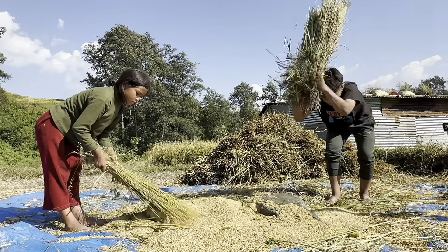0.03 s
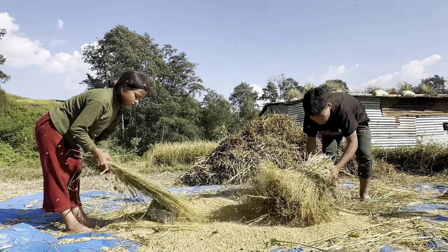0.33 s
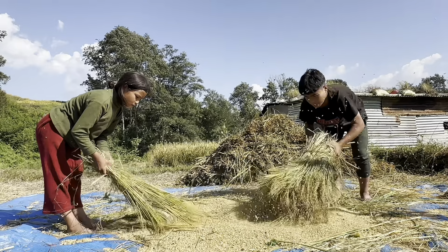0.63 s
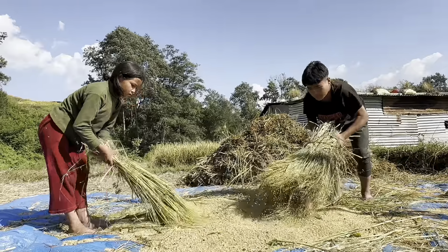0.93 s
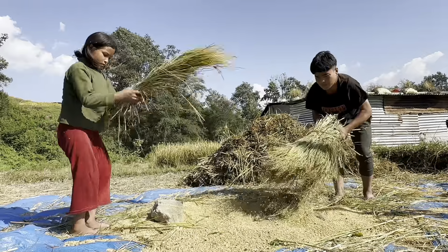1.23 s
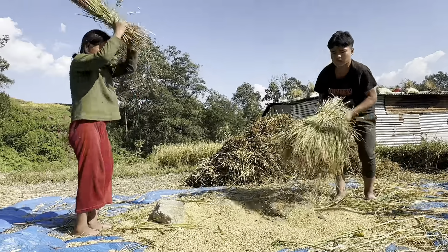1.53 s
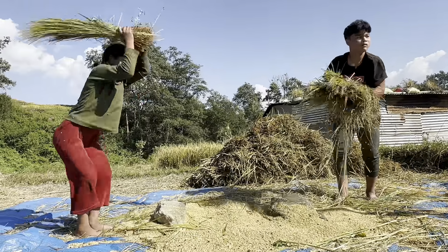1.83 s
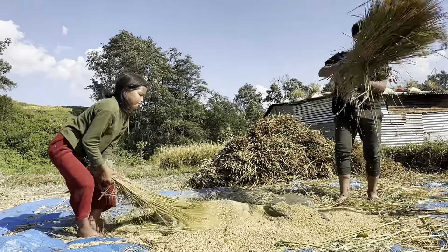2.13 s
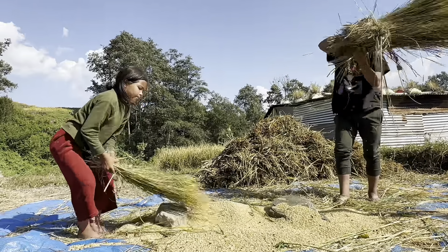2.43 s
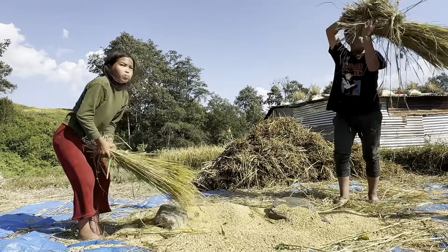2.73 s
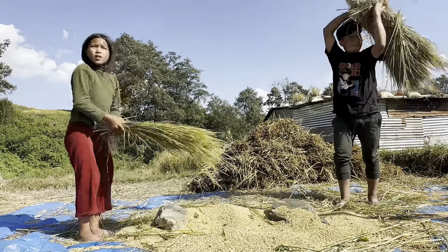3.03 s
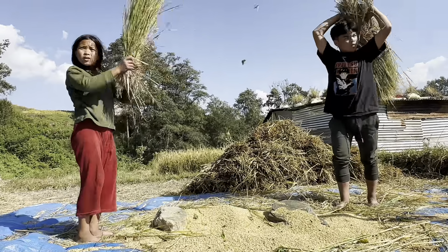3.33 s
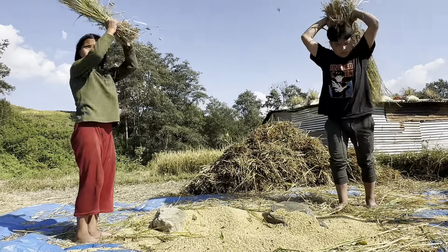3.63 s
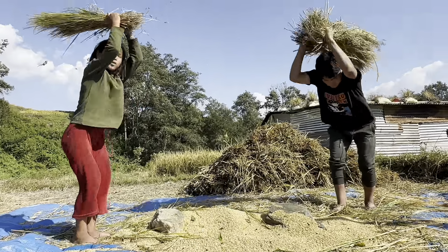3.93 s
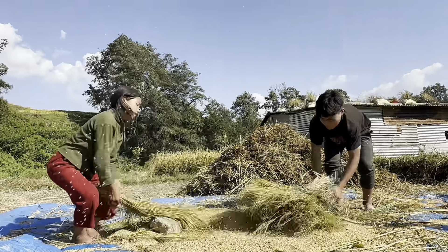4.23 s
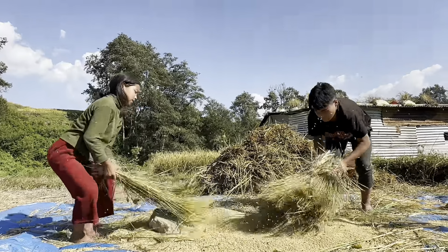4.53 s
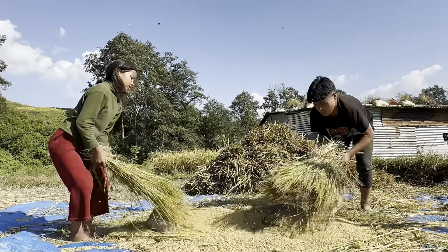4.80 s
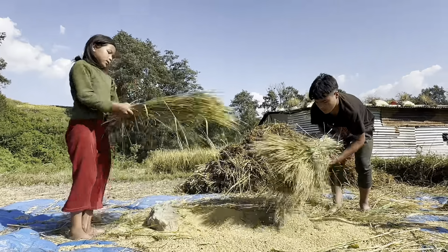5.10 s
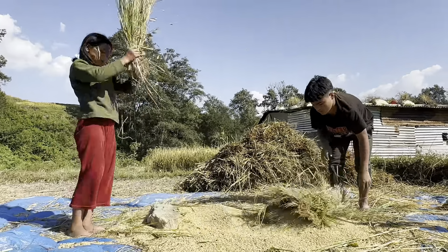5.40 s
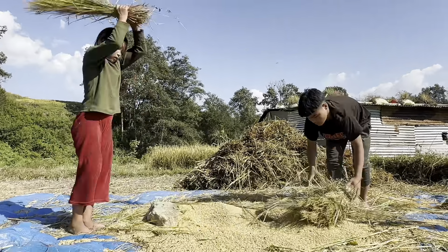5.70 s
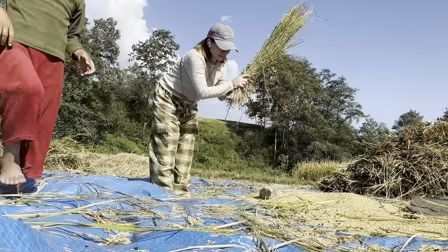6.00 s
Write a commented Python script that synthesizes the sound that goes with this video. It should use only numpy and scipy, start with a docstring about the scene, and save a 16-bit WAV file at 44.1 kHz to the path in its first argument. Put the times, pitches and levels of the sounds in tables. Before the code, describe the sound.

Bundles of dry stalks whack down in a field, followed by crackling straw and showers of grain, over faint insects and wind.

```python
"""Two people thresh rice in a field, swinging bundles overhead and beating them on stones on a tarp.
Each blow is a clatter of stalks with a thud from the pile and a puff of air. The dry straw rustles
and snaps as the bundles are lifted and shaken, and grain patters down in many tiny impacts.
Behind them insects hiss in the distance, something small clinks once, and light wind
bumps the microphone."""
import sys
import numpy as np
from scipy import signal
from scipy.fft import rfft, irfft, next_fast_len
from scipy.io import wavfile
from scipy.ndimage import uniform_filter1d

SR = 44100
rng = np.random.default_rng(int(sys.argv[2]) if len(sys.argv) > 2 else 0)


def to_wav(s):
    """Save 16-bit WAV."""
    ch = np.atleast_2d(s).T  # columns
    pcm = np.round(np.clip(ch, -1, 1) * 32767)  # PCM
    wavfile.write(sys.argv[1], SR, pcm.astype(np.int16))


N = 267113
T = np.arange(N) / SR


def amp(db):
    """Turns decibels into a gain to multiply by."""
    return 10 ** (np.asarray(db) / 20)


def read(points, hz):
    """Looks up a table at any frequency, sliding between its rows on a log scale."""
    f, value = np.transpose(points)
    return np.interp(np.log(hz + 1), np.log(f + 1), value)


def panned(db):
    """Left and right gains that make the left louder by db and keep the total power."""
    gains = amp(np.array([db, -db]) / 2).reshape(2, -1)
    return gains / np.sqrt(np.mean(gains ** 2, 0))


def drift(per_s):
    """A random curve that wanders about 1 either side of zero."""
    knots = rng.standard_normal(4000)
    return 1.22 * np.interp(T * per_s, np.arange(len(knots)), knots)


def swell(s, length, db, rise_s, fall_s):
    """Power of a sound that rises until s seconds, holds for its length and dies away."""
    before, after = np.maximum(s - T, 0), np.maximum(T - s - length, 0)
    return (amp(db) * np.exp(-np.minimum(before / rise_s + after / fall_s, 20))) ** 2


def add(mix, s, sound):
    """Mixes a stereo sound in at s seconds."""
    part = mix[:, max(round(s * SR), 0):][:, :sound.shape[1]]
    part += sound[:, :part.shape[1]]


def patter(n, per_s, spread_db, ring_s, bed):
    """Force of many tiny, uneven impacts; bed is the share of the power that stays smooth."""
    hits = rng.random(n) < per_s / SR
    sizes = amp(spread_db * np.minimum(rng.exponential(1, n), 3.5))
    power = signal.lfilter([1], [1, -np.exp(-1 / (ring_s * SR))], hits * sizes ** 2)
    return np.sqrt(bed + (1 - bed) * power / (power.mean() + 1e-12))


def crack_force(ring_s, tail=0, tail_s=.01):
    """Force of a small crack, starting 10 ms in: a sudden jab, with a weak tail if asked for."""
    t = np.arange(3000) / SR - .01
    return (t >= 0) * (np.exp(-abs(t) / ring_s) + tail * np.exp(-abs(t) / tail_s))


# How alike the two microphone sides sound. Each row: frequency in Hz, likeness from 0 to 1.
MIC_LIKENESS = [(200, .8), (1000, .5), (3000, .25), (9000, .35), (10000, .6), (10600, 1), (11800, 1),
                (12500, .6), (13300, 1)]
# How far the left side runs ahead. Each row: frequency in Hz, phase in radians.
MIC_PHASE = [(8000, 0), (9500, -1.1), (10500, -3.14), (12100, -3.14), (13200, -6.28)]
def excite(force, spectrum, lead_ms=0, pan_db=0, direct=0, treble_db=0, ring_hz=1000, ring_db=0,
           even=False):
    """Stereo noise that follows a force and takes a source's tone; direct makes the sides more alike."""
    n = len(force)
    size = next_fast_len(n + 2048)
    hz = np.fft.rfftfreq(size, 1 / SR)
    noise = rfft(force * rng.standard_normal((2, n)), size)
    if even:  # a hard impact drives all frequencies alike
        noise *= np.sqrt(np.sum(force ** 2) / uniform_filter1d(abs(noise) ** 2, size=size // 80))
    left, other = noise
    same = read(MIC_LIKENESS, hz)
    same += (1 - same) * direct
    aimed = np.clip((9000 - hz) / 2000, 0, 1)  # the microphone tells no direction in the top octave
    right = same * left + np.sqrt(np.maximum(1 - same ** 2, 0)) * other
    right *= np.exp(-1j * (read(MIC_PHASE, hz) + 2 * np.pi * hz * aimed * lead_ms / 1000))
    ring = ring_db * np.exp(-(np.log((hz + 1) / ring_hz) / 0.19) ** 2)
    treble = treble_db * np.clip(np.log2((hz + 1) / 1500), 0, 1)
    colour = amp(read(spectrum, hz) + ring + treble)
    colour /= np.sqrt(np.mean(colour ** 2))
    return irfft(np.array([left, right]) * colour * panned(pan_db * aimed), size)[:, :n]


# The tone of open land. Each row: frequency in Hz, level in dB.
HUSH_TONE = [(25, -6), (60, -2), (150, 1.5), (400, -2.5), (900, -4.5), (1800, -10.5), (3200, -13.5),
             (7500, -13), (10000, -19), (15000, -57)]
def field_hush(level_db=-57.5):
    """The soft hush of open land, wavering a little."""
    return amp(level_db) * excite(amp(.8 * drift(6)), HUSH_TONE)


# The tone of the far chorus. Each row: frequency in Hz, level in dB.
CHORUS_TONE = [(2000, -60), (3800, -22), (4200, -9), (4500, -17), (4680, -15), (4860, -2), (5200, 0),
               (5750, -1.5), (6050, -6), (6400, -14), (9000, -40)]
# Nearer insects. Each row: start in seconds, length in seconds, pitch in Hz, level in dB.
NEAR_INSECTS = [(1.1, 2.2, 4990, -61), (1.1, 2.7, 5270, -62), (2.75, 0.96, 5790, -62.5),
                (5.602, 0.4, 5150, -64)]
def insects(chorus_db=-54, width_hz=85, fade_s=0.16):
    """A far chorus hisses and flickers; a few nearer insects each hold one thin, high note."""
    flicker = amp(.5 * drift(8.6) + drift(60))
    out = amp(chorus_db) * excite(flicker, CHORUS_TONE, lead_ms=-0.083, direct=0.04)
    for s, length, hz, db in NEAR_INSECTS:
        note = [(hz - 2 * width_hz, -60), (hz - width_hz, -14), (hz, 0),
                (hz + width_hz, -14), (hz + 2 * width_hz, -60)]
        out += excite(np.sqrt(swell(s, length, db, fade_s, fade_s)), note, direct=0.15)
    return out


def clink(start_s=1.494, level_db=-45, hz=2450, ring_s=.35):
    """Something small and hard rings briefly and faintly."""
    out, t = np.zeros((2, N)), np.arange(SR // 3) / SR
    note = [(hz / 2, -45), (hz * 0.84, -16), (hz, 0), (hz * 1.08, -2), (hz * 1.2, -18), (hz * 2, -45)]
    add(out, start_s, excite(amp(level_db - 60 * t / ring_s), note, lead_ms=-0.32, direct=0.17))
    return out


def blow_puff(s, size, db):
    """The air a blow pushes, as a row like those of WIND_PUFFS: later, lower and longer if it is big."""
    return s + 0.014 + 0.021 * size, db, 123.6 - 51 * size, 0.004 + 0.011 * size


# The tone of wind on the microphone. Each row: frequency in Hz, level in dB.
WIND_TONE = [(20, -68), (45, 1.5), (70, 3), (120, -2), (250, -8.5), (450, -22), (1000, -21.5), (4000, -58)]
# Gusts. Each row: start in seconds, length in seconds, level in dB.
WIND_GUSTS = [(0.202, 0.9, -42.5), (2.45, 0.15, -54), (4.46, 0.64, -61), (5.127, 0.81, -54.5)]
def wind(gain_db=3.0, calm_db=-68.5, wake_db=-50.5, big_wake_db=20):
    """Gusts, and the air left stirring after each blow, rumble unevenly on each microphone side."""
    power = amp(calm_db) ** 2 + sum(swell(*gust, rise_s=0.19, fall_s=0.16) for gust in WIND_GUSTS)
    for s, size, *_, puff_db in BUNDLE_BLOWS:
        peak_s, _, _, half_s = blow_puff(s, size, puff_db)
        power += swell(peak_s, half_s, wake_db + big_wake_db * size, rise_s=half_s, fall_s=0.031)
    lumps = np.sqrt(power) * amp(gain_db + 2.3 * drift(35))
    return sum(excite(lumps, WIND_TONE) * panned(side_db) for side_db in (14, -14)) / np.sqrt(2)


# The tone of swirling air and of dull knocks. Each row: frequency in Hz, level in dB.
DULL_TONE = [(40, -39), (130, 2), (260, 3), (400, -4), (600, -11.5), (1000, -31), (3000, -71)]
# Bumps of wind. Each row: time of the peak in seconds, level in dB, pitch in Hz, half length in seconds.
WIND_PUFFS = [(0.084, -31.5, 129.5, 0.011), (0.268, -16.5, 124, 0.0078), (.317, -23.5, 180, 0.0053),
              (.348, -23, 215, 0.0068), (.415, -29, 192, .007), (0.531, -24.5, 180, 0.01),
              (.598, -24.5, 180.6, 0.005), (.662, -21, 181, 0.0064), (.678, -22.5, 258, 0.0056),
              (.694, -20.5, 185, 0.0063), (0.748, -23.5, 232, .004), (.762, -20, 92, 0.017),
              (.79, -29, 200, 0.0032), (.848, -38, 90, 0.011), (.962, -27.5, 106, 0.02),
              (1.034, -22, 176, 0.007), (1.073, -21.5, 128, 0.0043), (1.157, -30, 170, 0.006),
              (1.322, -36, 78.9, 0.011), (1.499, -44, 238, .009), (1.585, -38.5, 69.4, 0.0099),
              (1.918, -38, 87, 0.01), (2.615, -41, 80.5, 0.023), (3.093, -34, 87, .015),
              (3.286, -31.5, 85, 0.0086), (5.259, -30, 64.5, 0.01), (5.39, -30, 56.5, 0.015),
              (5.478, -29, 82, 0.012), (5.611, -32.5, 85, 0.011), (5.776, -24.5, 57.5, 0.011)]
def air_puffs(gain_db=-3.5, eddy_db=-13, skew_radians=0.62, slowing=0.39):
    """Single puffs from the wind and the blows swing the microphone's diaphragm a cycle or two."""
    out = np.zeros((2, N))
    pushed = [blow_puff(s, size, db) for s, size, *_, db in BUNDLE_BLOWS]
    for s, db, hz, half_s in WIND_PUFFS + pushed:
        t = np.arange(-3 * half_s, 3 * half_s, 1 / SR)
        bump = amp(db + gain_db) / np.cosh(np.pi / 2 * t / half_s)
        speed = hz / 130
        sag = slowing * np.clip(speed - 1, 0, 1)  # a fast swirl slows as it passes
        turns = hz * (t - 2 * sag * half_s * np.log(np.cosh(t / half_s)))
        swing = -np.cos(2 * np.pi * turns + skew_radians * np.array([[1], [-1]]))
        churn = amp(eddy_db) * speed ** 1.96 * excite(bump, DULL_TONE)  # fast puffs are rougher
        add(out, s - 3 * half_s, bump * swing * panned(1.0) + churn)
    return out


# The tone of rubbing straw. Each row: frequency in Hz, level in dB.
STRAW_TONE = [(100, -4), (400, 4), (1000, 1.5), (2500, 2), (3300, 0), (4000, 3), (4700, 5), (5500, 6),
              (7200, 5.5), (8100, 7), (9300, 1), (11500, 2.5), (14500, 4), (16000, 7)]
# Lifts and turns of a bundle. Each row: start in seconds, length in seconds, level in dB.
BUNDLE_LIFTS = [(0.58, 0.36, -49.5), (1.51, 0.098, -55.5), (1.752, 0.17, -61.5), (2.38, 0.067, -52),
                (2.537, 0.086, -55), (2.787, 0.18, -58.5), (4.507, 0.14, -49.5), (4.896, 0.063, -58),
                (5.37, 0.097, -47), (5.985, .07, -56)]
def straw_rustle(gain_db=7.5, rest_db=-67.5, swing_db=-45):
    """Dry stalks rub in a fine, bright fizz whenever a bundle is swung, settles or is lifted."""
    power = amp(rest_db) ** 2
    for s, size, *_ in BUNDLE_BLOWS:
        lead_s = 0.062 * size  # a big bundle is at full speed a little before it lands
        rise_s, settle_s = 0.039 * (1 + 1.3 * size), 0.065 * (1 + 8.2 * size)
        power += swell(s - lead_s, lead_s, swing_db, rise_s, settle_s)
    for s, length, db in BUNDLE_LIFTS:
        power += swell(s, length, db, rise_s=0.12, fall_s=0.009 + 0.71 * length)
    rubbing = patter(N, per_s=1800, spread_db=2.2, ring_s=.0006, bed=.35) * amp(0.43 * drift(130))
    return amp(gain_db) * np.sqrt(power) * excite(rubbing, STRAW_TONE)


# Shakes that spill grain. Each row: start in seconds, length in seconds, level in dB,
# crackle above patter in dB, left above right in dB.
BUNDLE_SHAKES = [(0.708, 0.25, -38.5, -11.5, -3.5), (1.17, 0.16, -56.5, -1, -2.5),
                 (1.51, 0.038, -56, -1.5, -3.5), (2.422, 0.11, -57, 2.5, -16),
                 (2.63, 0.081, -57.5, -4.5, -21), (3.054, 0.18, -60, 0, -9), (3.888, 0.005, -61, -1, -9),
                 (4.464, 0.22, -42.5, -1.5, 4), (4.864, 0.057, -40.5, -1.5, -0.5),
                 (4.985, 0.13, -44.5, -5, 3), (5.451, 0.0062, -50.5, -0.5, -21), (5.906, 0.11, -56, -5, 6)]
def grain_spill(trickle_db=-69, flight_s=0.069, thrown_crisp_db=-2.5, thrown_side_db=4):
    """How strongly grain falls, soft and crisp, left and right: blows throw it and shakes shed it."""
    falls = []
    for s, _, db, fade_s, *_ in BUNDLE_BLOWS:
        thrown = swell(s + flight_s, 0, db, rise_s=0.0052, fall_s=fade_s)
        falls.append((thrown, thrown_crisp_db, thrown_side_db))
    for s, length, db, crisp_db, side_db in BUNDLE_SHAKES:
        linger_s = 0.49 * length  # a long shake builds up and trickles on for longer
        shed = swell(s, length, db, rise_s=0.035 + linger_s, fall_s=0.016 + linger_s)
        falls.append((shed, crisp_db, side_db))
    soft = crisp = amp(trickle_db) ** 2
    for power, crisp_db, side_db in falls:
        placed = power * panned(side_db) ** 2
        soft = soft + placed
        crisp = crisp + placed * amp(crisp_db) ** 2
    return np.sqrt(soft), np.sqrt(crisp)


def shower(strength, spectrum, clump_db=1.6, **impacts):
    """Tiny impacts come in clumps, at the feet of the left and the right worker."""
    out = 0
    for side, level in zip((1, -1), strength / np.sqrt(2)):
        force = level * patter(N, **impacts) * amp(clump_db * drift(50))
        out += excite(force, spectrum, lead_ms=0.36 * side, pan_db=9 * side, direct=0.031)
    return out


# The tones of grain landing softly and crisply. Each row: frequency in Hz, level in dB.
PATTER_TONE = [(60, -34), (250, -6), (500, -5), (900, 1), (1600, -0.5), (2300, -6), (3500, -12.5),
               (6000, -16), (15000, -31)]
CRACKLE_TONE = [(300, -1.5), (1200, -3), (2500, 1.5), (3600, 6.5), (5000, -1), (6800, 2.5), (8500, -20),
                (10500, -11), (15000, -43)]
def falling_grain(soft_fall, crisp_fall, soft_db=1.8, crisp_db=1.5):
    """Grain patters softly on the pile and crackles on the tarp and the dry straw."""
    soft = shower(soft_fall, PATTER_TONE, per_s=520, spread_db=3.5, ring_s=.0011, bed=.08)
    crisp = shower(crisp_fall, CRACKLE_TONE, per_s=380, spread_db=4.8, ring_s=.0005, bed=.05)
    return amp(soft_db) * soft + amp(crisp_db) * crisp


# The tone of one grain landing. Each row: frequency in Hz, level in dB.
TICK_TONE = [(2000, -25), (5000, -12), (8000, 7), (10000, 2), (13000, 0), (15500, 6.5)]
# Single flung grains. Each row: time in seconds, level in dB.
NEAR_GRAINS = [(.502, -32), (.979, -26), (3.492, -43), (4.722, -35), (4.814, -31), (4.976, -29)]
def grain_ticks(gain_db=6.0):
    """Single grains land close to the microphone with tiny, bright clicks."""
    out, force = np.zeros((2, N)), crack_force(ring_s=0.00088)
    for s, db in NEAR_GRAINS:
        add(out, s - .01, amp(db + gain_db) * excite(force, TICK_TONE, direct=.6))
    return out


# The tone of a dry stalk cracking. Each row: frequency in Hz, level in dB.
SNAP_TONE = [(100, -13), (300, -4), (550, -2), (1000, -0.5), (1600, -5), (2500, -5), (4000, -10.5),
             (7000, -13), (9000, -23), (15000, -60)]
# The loudest stalks snapping and clumps of grain landing.
# Each row: time in seconds, level in dB, treble boost in dB, ringing pitch in Hz.
LOUD_SNAPS = [(0.293, -24.5, -22, 760), (0.32, -29, 1, 580), (0.337, -21.5, -6, 2210),
              (0.346, -20.5, 0, 1980), (0.36, -27, -5, 2050), (0.378, -25, -2, 2230),
              (0.392, -32, -11, 1910), (0.451, -26.5, -3, 850), (0.472, -24.5, 2.5, 880),
              (0.539, -30, 1, 907), (0.605, -30, 21, 5450), (0.655, -29, -4, 2210),
              (0.729, -25.5, -4, 1440), (0.751, -26.5, -1, 1910), (0.786, -26, -7, 1710),
              (0.825, -29, -18, 1980), (0.843, -49, 0, 1360), (0.877, -33, 2, 1260), (0.908, -32, -8, 1310),
              (0.945, -28, -1, 2210), (0.961, -30.0, 3, 1090), (1.014, -28.5, -5, 1230),
              (1.054, -30.5, 3, 500), (1.122, -38, 0.5, 1910), (1.215, -37.5, 3, 3090),
              (1.325, -37.5, 2, 870), (1.494, -33.5, -3, 2300), (2.228, -34.5, 4, 3000),
              (2.386, -43, -8, 500), (2.411, -37, -9, 4160), (2.46, -33, -4, 500), (2.483, -38, 0, 726),
              (2.5, -33.5, -4, 1430), (2.53, -42, -2, 1050), (2.543, -50, 9, 3860), (2.576, -37.0, -4, 700),
              (2.663, -33, -9, 496), (2.708, -37, 1, 1980), (2.722, -34.5, -8, 940),
              (2.742, -36.5, -2, 2130), (2.825, -40.5, 1, 786), (2.856, -39, 1, 1230),
              (2.867, -38, -5, 714), (4.314, -22.5, -2, 2430), (4.355, -22.5, -12, 1340),
              (4.373, -23.5, 8, 660), (4.429, -31, 19, 2960), (4.455, -26.0, 21, 1310),
              (4.488, -27, 8, 1450), (4.516, -27.0, 14, 554), (4.53, -29.5, 4, 4200),
              (4.581, -27.5, -6, 2130), (4.604, -36, 1, 1470), (4.64, -28.5, 6, 500),
              (4.739, -31, 10, 1430), (4.772, -28, 2, 766), (4.81, -28.5, -1, 3370), (4.87, -31, -2, 806),
              (4.886, -28, -4, 1580), (4.962, -24.5, -9, 1010), (4.994, -30.5, 3, 2980),
              (5.007, -29.5, -1, 2380), (5.024, -28.5, -1, 770), (5.065, -28, -5, 1210),
              (5.081, -41, 1, 3090), (5.124, -22, -13, 980), (5.143, -29, 3, 1200), (5.176, -29, 0, 6530),
              (5.197, -28.5, -2, 1160), (5.236, -33.5, -5, 1470), (5.327, -36, 0, 2230)]
def stalk_snaps(fall, gain_db=0.62, small_per_s=29, small_hz=1330, spread_octaves=0.76):
    """Short, dry cracks, each with its own pitch and a little rattle, from the side where grain spills."""
    out, force = np.zeros((2, N)), crack_force(ring_s=0.0015, tail=0.17, tail_s=0.016)
    usual_db = 20 * np.log10(fall.mean(0)) + 6  # small snaps are louder when more grain falls
    spill_side = np.tanh(2 * np.log(fall[0] / fall[1]))  # 1 is left, -1 is right
    starts = np.flatnonzero(rng.random(N) < small_per_s / SR)
    small = [(T[i], usual_db[i] + 6 * loud, 4 * bright, small_hz * 2 ** (spread_octaves * high))
             for i, (loud, bright, high) in zip(starts, rng.standard_normal((len(starts), 3)))]
    for s, db, treble_db, hz in LOUD_SNAPS + small:
        side = spill_side[round(s * SR)]
        crack = excite(force, SNAP_TONE, lead_ms=0.31 * side, pan_db=2.5 * side, direct=0.2,
                       treble_db=treble_db, ring_hz=hz, ring_db=6.5, even=True)
        add(out, s - 0.0095, amp(db + gain_db) * crack)
    return out


def pile_thud(t, size, db, hz, lag_s=0.0038, press_s=0.0015, sag_s=0.018, knock_db=-8.0):
    """The pile under a blow gives a low note and a dull knock."""
    age = np.maximum(t - lag_s, 0)
    pressed = age / (press_s * (1 + size))  # a big bundle presses longer
    push = amp(db) * pressed * np.exp(1 - pressed)
    turns = hz * sag_s * np.log1p(age / sag_s)  # the pitch sags as the pile gives way
    knock = amp(knock_db) * excite(push, DULL_TONE, direct=0.5, even=True)
    return push * np.sin(2 * np.pi * turns) + knock


def stalk_force(t, rise_s, landing_s, fall_s, rush_db=-25, rush_s=0.032, tail_db=-21, tail_s=0.012):
    """Stalks rush down, land one after another within a few milliseconds, then shiver briefly."""
    before, after = np.maximum(-t, 0), np.maximum(t - landing_s, 0)
    slap = np.exp(-before / rise_s - after / fall_s)
    shiver = np.where(t < 0, amp(rush_db), amp(tail_db)) * np.exp(-before / rush_s - after / tail_s)
    return np.hypot(slap, shiver) * patter(len(t), per_s=5800, spread_db=3.5, ring_s=0.00032, bed=0.57)


# The tones of a big and a small bundle landing. Each row: frequency in Hz, level in dB.
BIG_TONE = [(100, -5), (260, 0.0), (560, -3.5), (830, -9.5), (1020, -4.5), (1180, -9), (1380, -3.5),
            (2400, -8.5), (3300, -5.5), (4300, -3.5), (5300, -10.5), (7000, -4.5), (9000, -11.9),
            (10500, -12.4), (12500, -11.2), (15000, -10.2)]
SMALL_TONE = [(100, -17), (340, -1.5), (500, -7), (660, -23), (830, -8), (1000, -4.5), (1280, -14),
              (1570, -.5), (1850, -6.5), (2400, -5.5), (3400, -1.5), (4400, -4), (5500, -1.5), (7000, -4.5),
              (9000, -12), (10500, -8.2), (12500, -10.8), (15000, -9.5)]
# The blows. Each row: time in seconds, bundle size from 0 to 1, thrown grain level in dB, its fade in
# seconds, clatter level in dB, its rise, landing and fall times in seconds, thud level in dB, thud pitch
# in Hz, the left side's head start in milliseconds, boost of the crack in dB, air puff level in dB.
BUNDLE_BLOWS = [(0.2225, 0.87, -35.5, 0.15, -13, 0.0015, 0.01, 0.01, -28, 215, -0.045, -0.5, -22),
                (2.061, 0.07, -59, 0.95, -6, 0.00087, 0.0035, 0.0017, -13.5, 360, 0.11, -1.5, -27),
                (4.2051, 0.93, -34, 0.17, -10.5, 0.0017, 0.0057, 0.0077, -13.5, 309, -0.032, -2.5, -16.5),
                (4.2639, 0.08, -57, 0.13, -6, 0.001, 0.0019, 0.003, -21, 352, 0.11, 6, -16.5)]
def bundle_blows(crack_hz=3220, lead_in_s=.1):
    """A bundle is beaten on the stones: its stalks clatter and the pile under them thuds."""
    out = np.zeros((2, N))
    t = np.arange(SR // 3) / SR - lead_in_s
    frequencies = sorted(hz for hz, _ in BIG_TONE + SMALL_TONE)
    for s, size, _, _, db, rise, landing, fall, thud_db, thud_hz, lead_ms, crack_db, _ in BUNDLE_BLOWS:
        force = stalk_force(t, rise, landing, fall)
        tone = [(hz, size * read(BIG_TONE, hz) + (1 - size) * read(SMALL_TONE, hz)) for hz in frequencies]
        clatter = excite(force, tone, lead_ms, pan_db=-1.0, direct=0.49,
                         ring_hz=crack_hz, ring_db=crack_db, even=True)
        add(out, s - lead_in_s, amp(db) * clatter + pile_thud(t, size, thud_db, thud_hz))
    return out


def scene():
    """Adds the threshing and the sounds around it together."""
    soft_fall, crisp_fall = grain_spill()
    threshing = bundle_blows() + falling_grain(soft_fall, crisp_fall) + straw_rustle() + grain_ticks()
    around = clink() + wind() + air_puffs() + field_hush() + insects()
    return threshing + stalk_snaps(soft_fall) + around


def record(dry, ceiling=.95, top_hz=15950):
    """Gently rounds off the highest peaks, then cuts the very top of the treble."""
    rounded = np.tanh(dry / ceiling) * ceiling
    low_pass = signal.firwin(401, top_hz, window=("kaiser", 8), fs=SR)
    return signal.oaconvolve(rounded, low_pass[None], "same")


dry = scene()
out = record(dry)
to_wav(out)
```